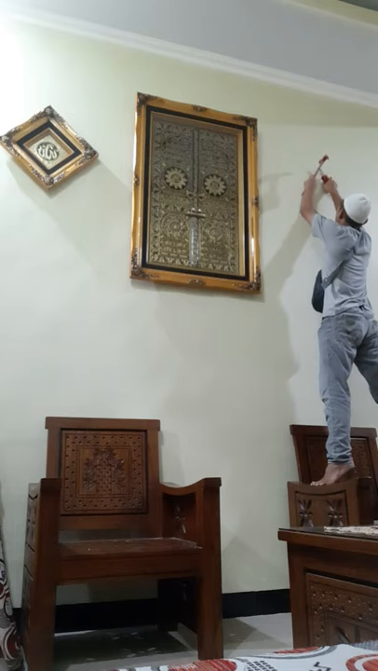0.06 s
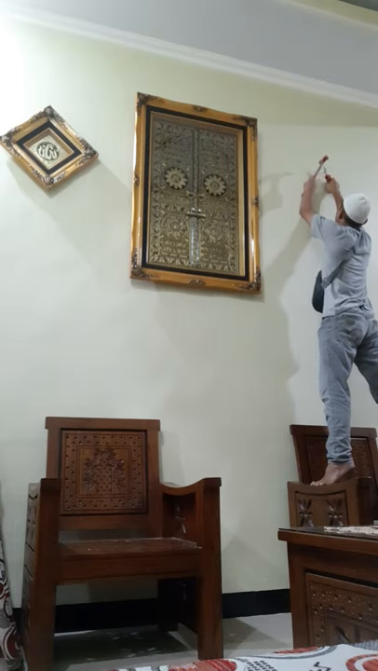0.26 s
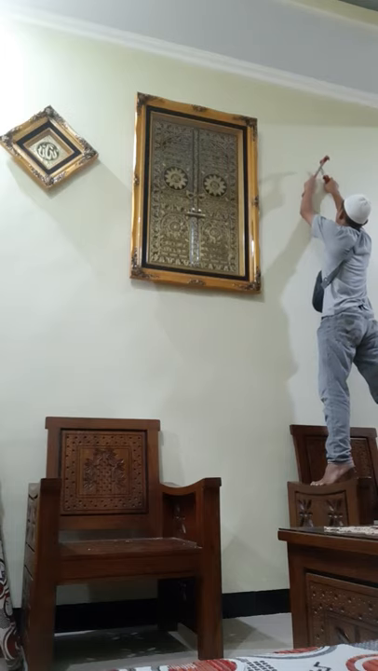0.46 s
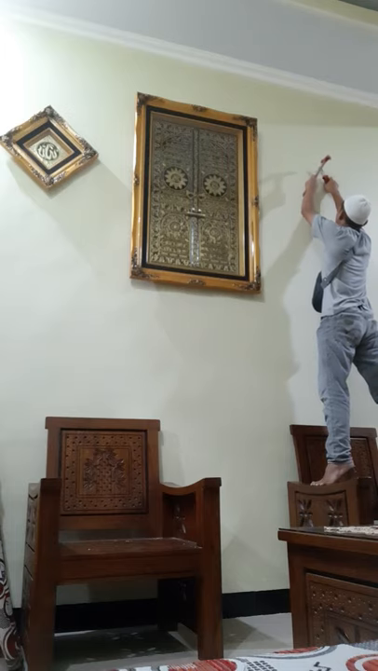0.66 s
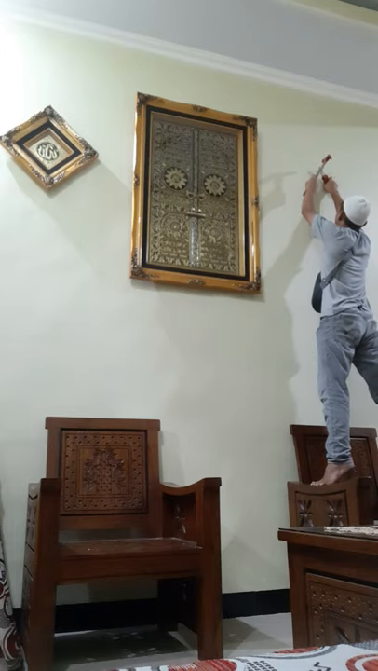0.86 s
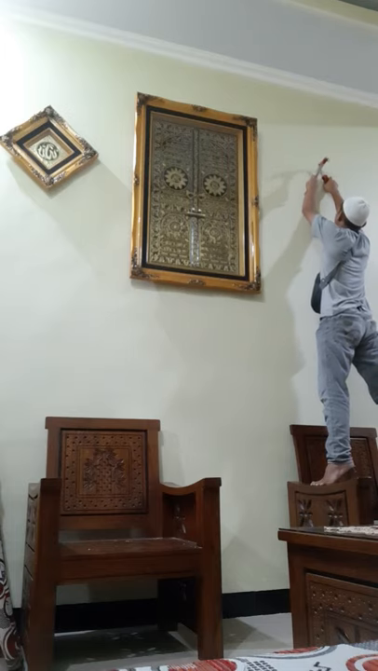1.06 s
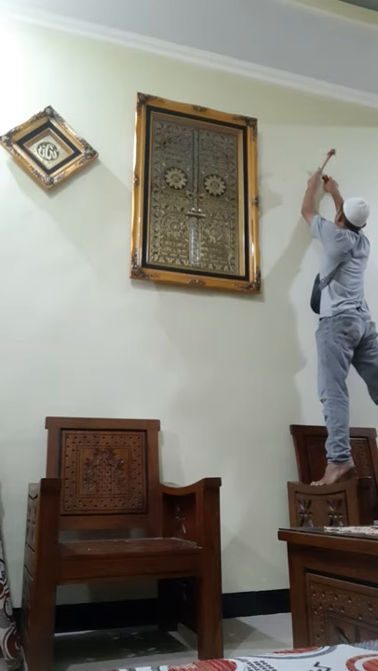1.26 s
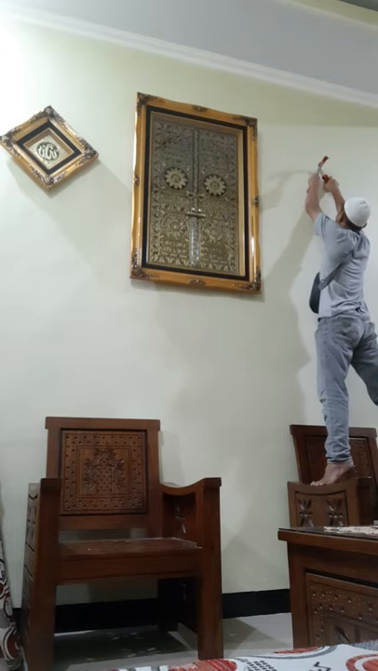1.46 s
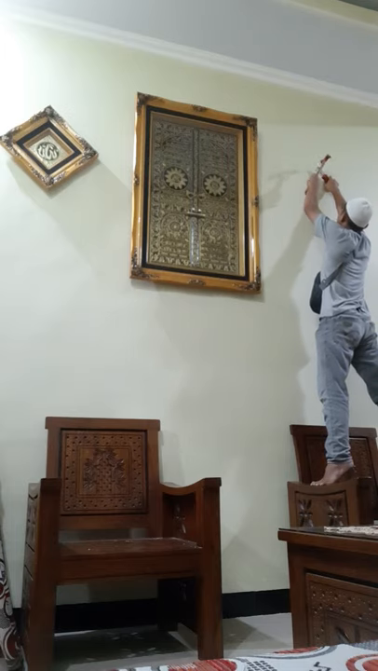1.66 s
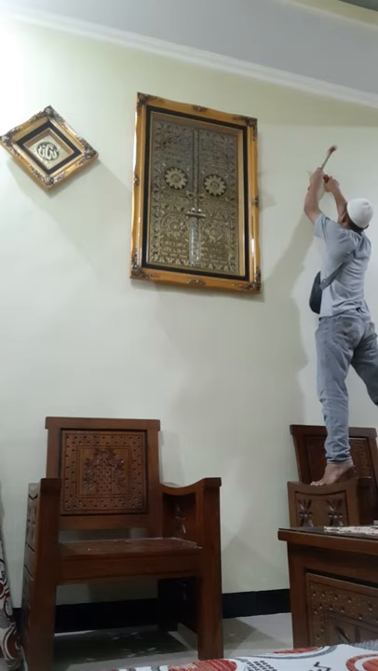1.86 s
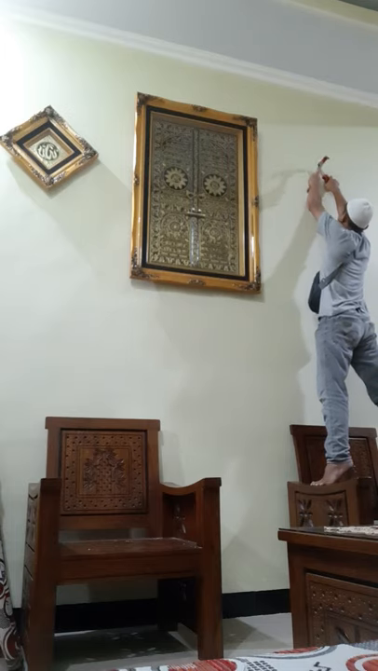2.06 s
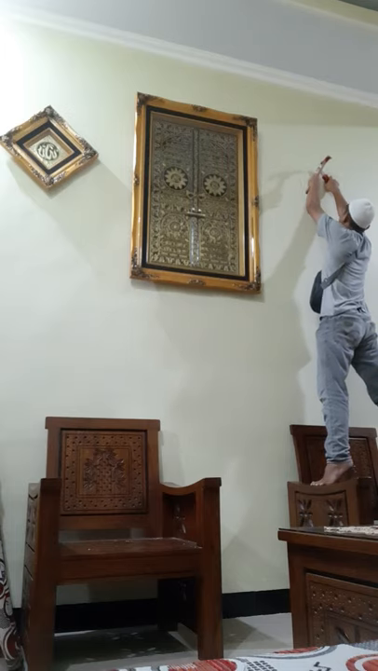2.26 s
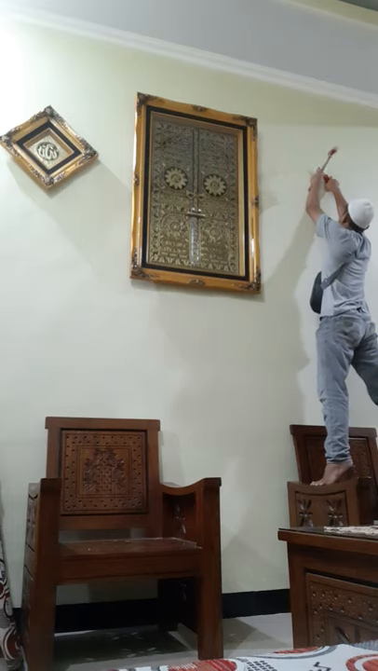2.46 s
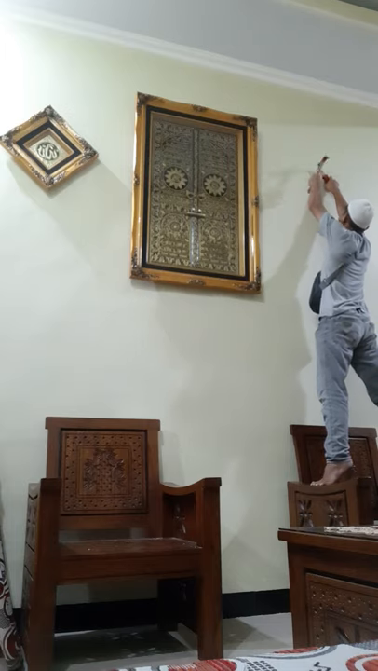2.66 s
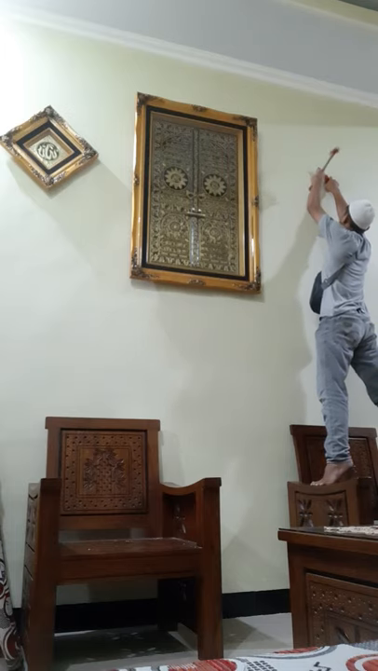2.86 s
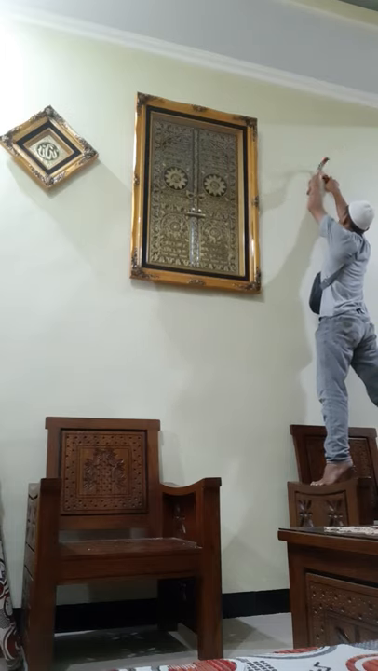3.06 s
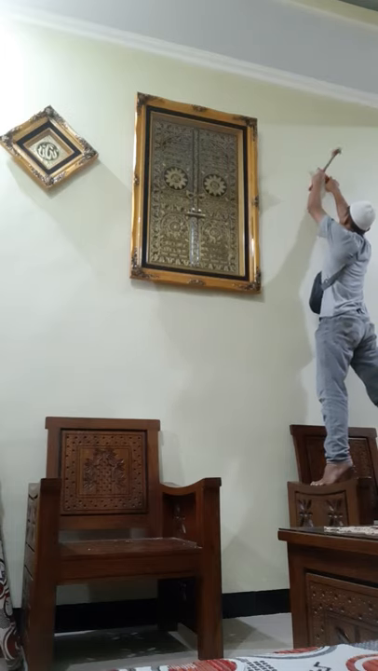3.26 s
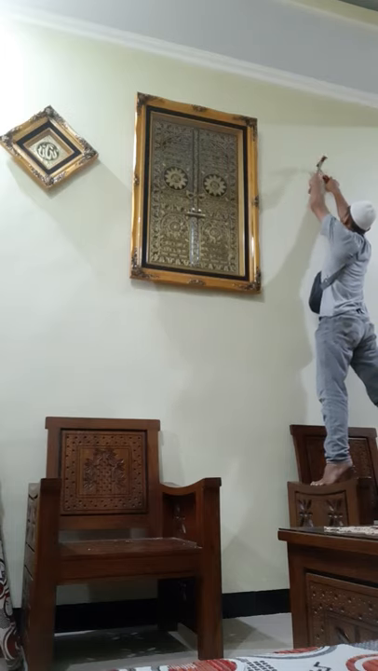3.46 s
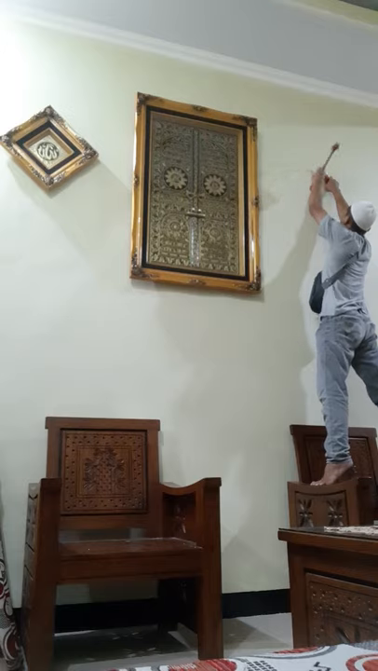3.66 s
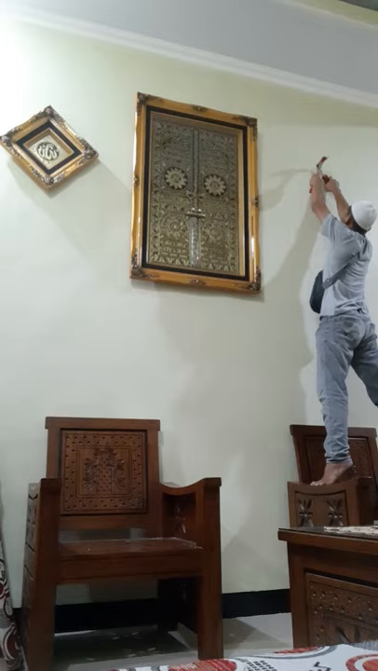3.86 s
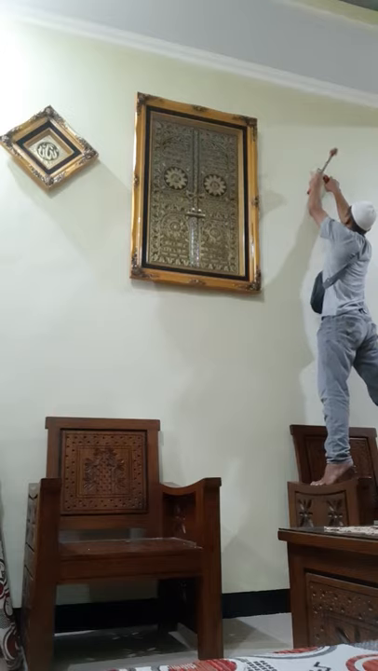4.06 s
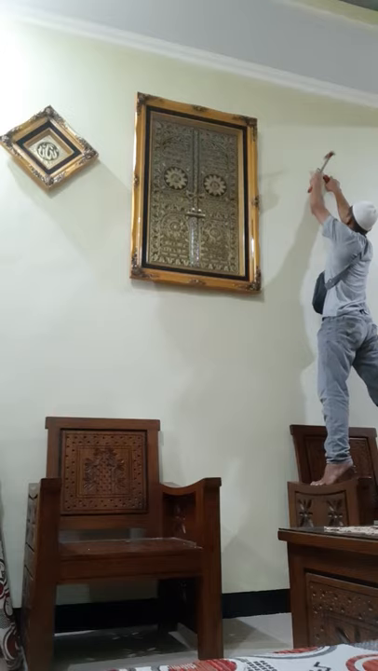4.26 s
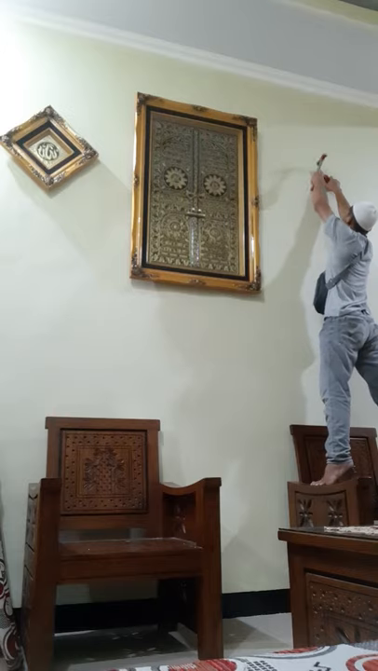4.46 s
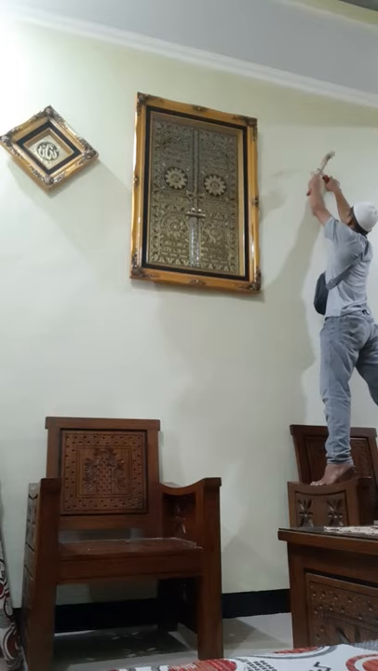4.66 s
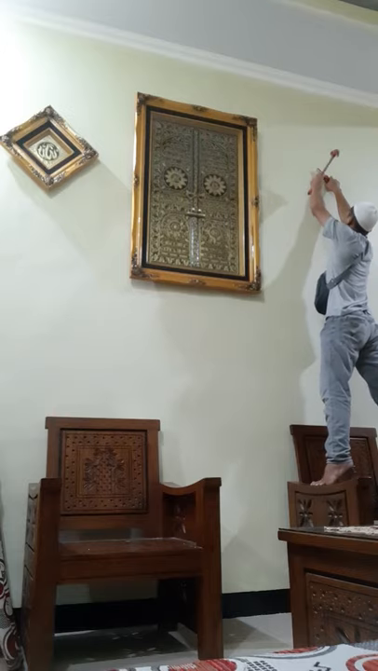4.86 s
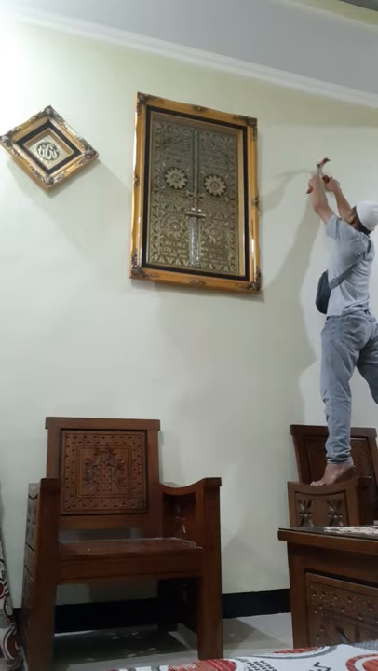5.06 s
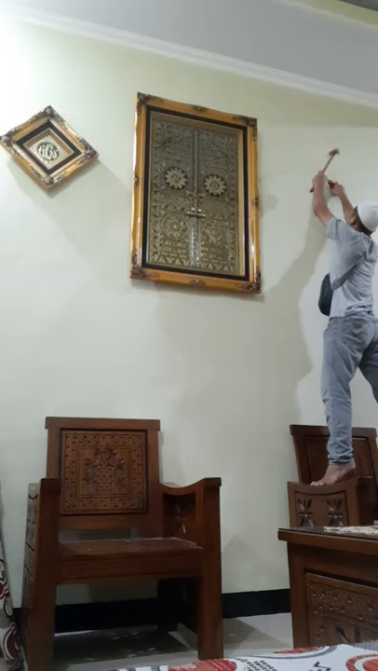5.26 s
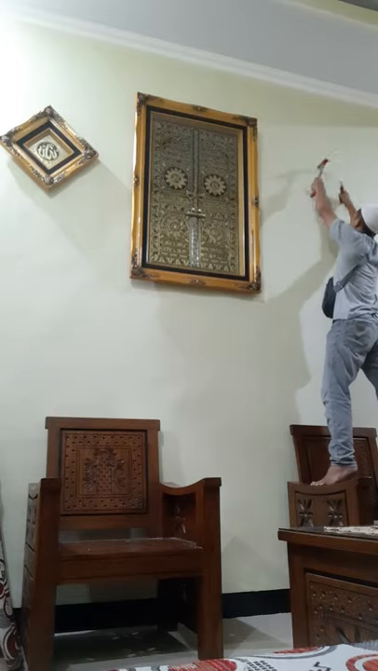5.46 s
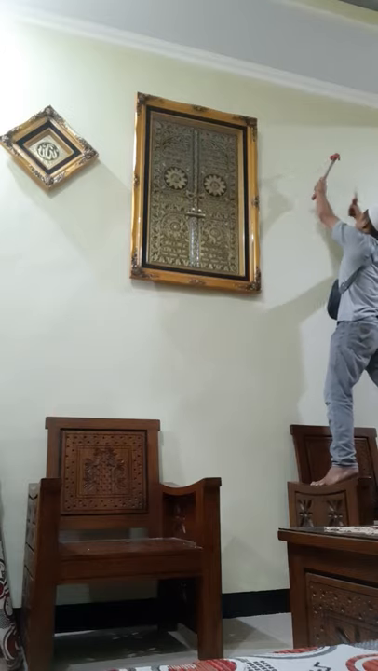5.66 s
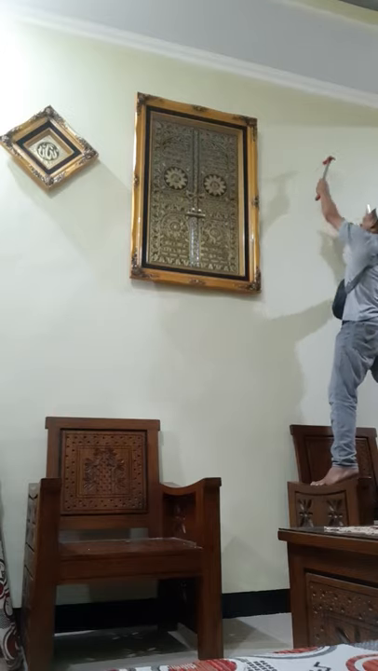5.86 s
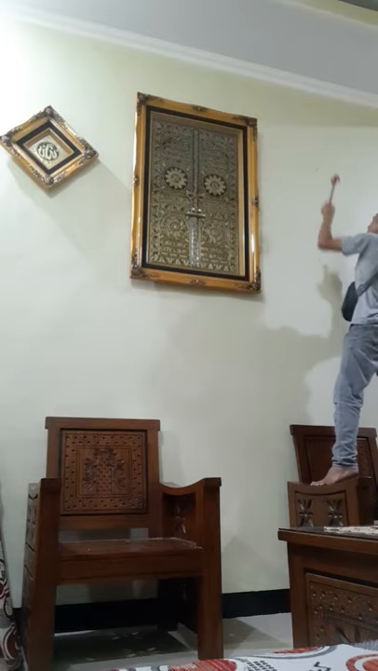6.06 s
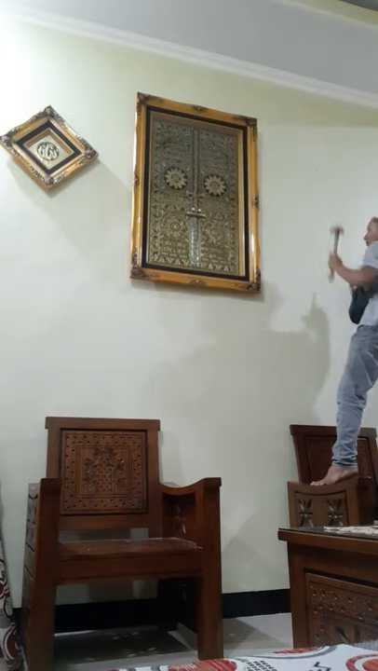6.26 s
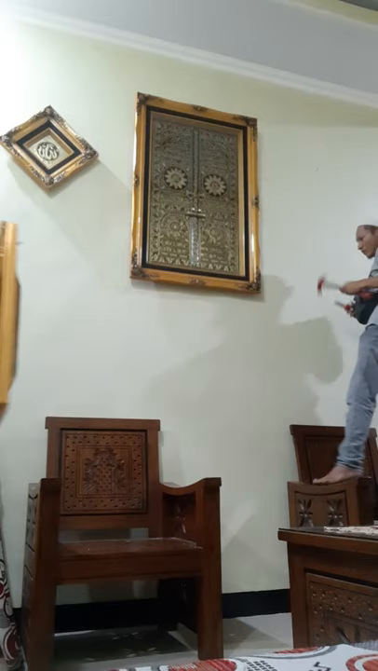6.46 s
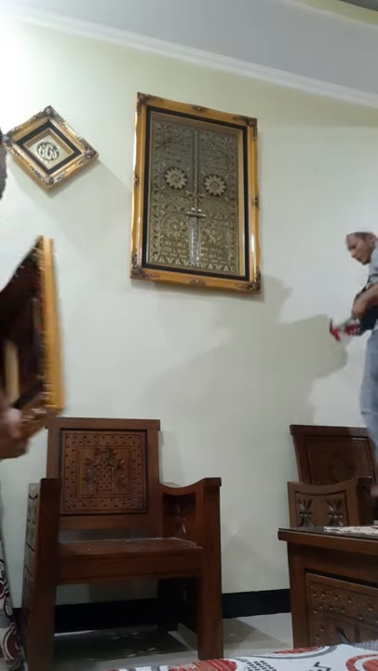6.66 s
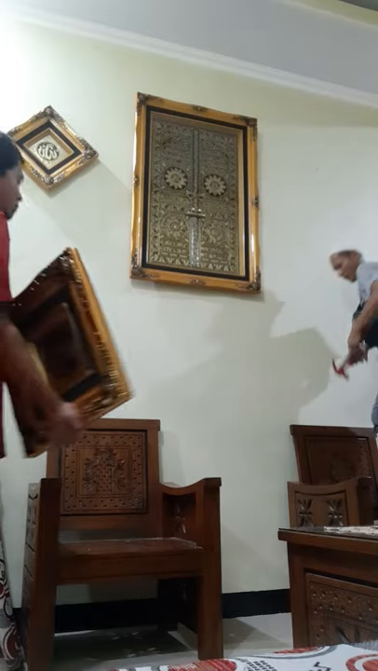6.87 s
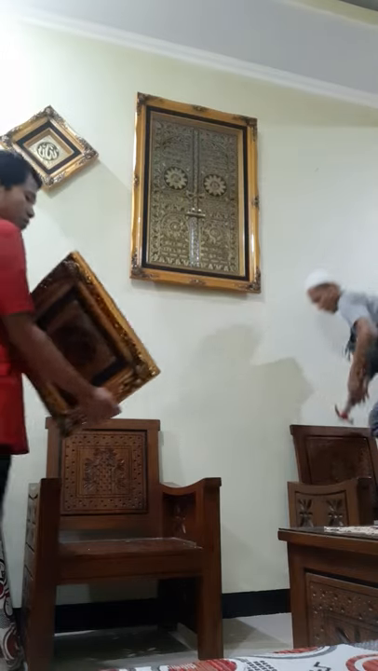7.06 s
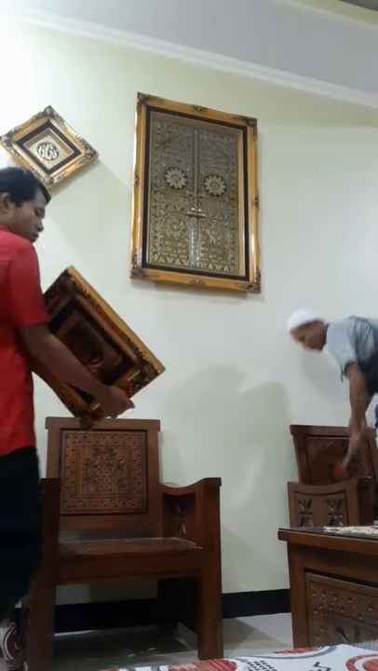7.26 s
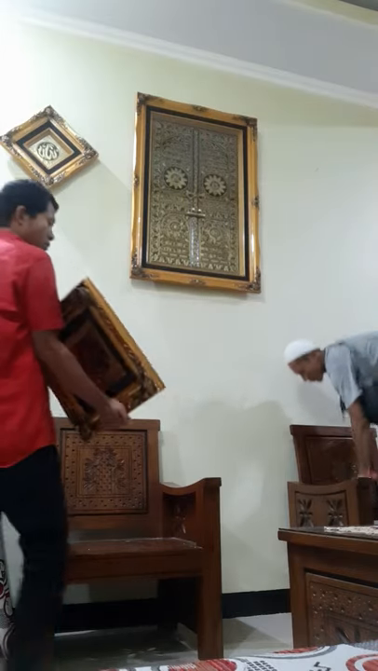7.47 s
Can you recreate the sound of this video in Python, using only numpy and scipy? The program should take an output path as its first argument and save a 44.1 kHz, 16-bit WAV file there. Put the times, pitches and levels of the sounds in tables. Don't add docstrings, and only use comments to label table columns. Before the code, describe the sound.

Quiet room air and dull distant traffic come first, with a brief cloth rustle. Then a hammer hits a nail in a plastered wall: a dull thud, a loud knock, light taps between full blows, then regular hard strikes two or three a second. Steel snaps and rings very briefly, and the bare room answers with a lively tail. After the last blow the reverberation fades into faint clothing movement and a wooden frame being handled, heard from across the room.

```python
import sys
import numpy as np
from scipy import signal
from scipy.fft import rfft, irfft
from scipy.io import wavfile
from scipy.ndimage import uniform_filter1d

SR = 44100
rng = np.random.default_rng(int(sys.argv[2]) if len(sys.argv) > 2 else 0)


def voltage_ratio(decibels):
    exponent = np.asarray(decibels, float) / 20
    return 10 ** exponent


def wav_record(signal):
    frames = np.transpose(np.atleast_2d(signal))
    bounded = np.clip(frames, -1, 1)
    quanta = np.round(bounded * 32767).astype(np.int16)
    wavfile.write(sys.argv[1], SR, quanta)


N = 330744

# (time [s], push level [dB], contact time [ms], crack level [dB], steel ring level [dB])
BLOWS = [(1.108, -13.5, 1.3, -50.5, -48), (1.451, -5.6, 1.15, -33, -41), (1.8007, -18, 0.666, -43, -59),
         (2.1095, -7, 0.981, -28, -31.5), (2.4068, -21.5, 0.6506, -46, -54),
         (2.7031, -8.5, 0.898, -28, -37), (3.1205, -8, 0.931, -28, -36), (3.5052, -8, 0.98, -29, -37),
         (3.8625, -8.5, 0.977, -28, -36.5), (4.178, -9, 0.915, -28, -36.5), (4.4625, -9, 0.954, -30, -43),
         (4.747, -9, 0.988, -28.5, -29.5), (5.008, -9.5, 1.069, -29.5, -35), (5.5169, -9, 1.245, -29, -43),
         (5.8112, -10, 1.128, -30.5, -42)]
# (frequency [Hz], level [dB])
WALL_RADIATION = [(30, -36.5), (60, -17.5), (110, -15.5), (160, -9.5), (250, -2.5), (400, -2), (700, 0),
                  (1000, 1.5), (1330, 5.5), (1650, -2), (2200, 1), (2800, 1), (3100, -15), (16000, -43.5)]
# (frequency [Hz], level [dB])
CRACK_COLOUR = [(1000, -54.5), (2000, -3), (2700, -4), (3200, -5), (4400, -1), (6000, -7.5), (7600, -8),
                (8600, -15.5), (9600, -28), (16000, -52.5)]
# (frequency [Hz], level [dB], decay time T60 [s])
STEEL_MODES = [(4462, 9, 0.04), (4700, -5.5, 0.026), (7000, -6, .05), (7468, -4, .015), (7957, -10, .02)]
# (frequency [Hz], level [dB])
FIZZ_COLOUR = [(5500, -19), (7000, 1), (9500, -3), (11000, -3), (13500, -1), (15300, -4.5), (17000, 4.5)]
# (time [s], level [dB])
FRAME_TICKS = [
    (7.058, -41.5),
    (7.078, -66),
]
# (time after blow [s], level [dB], right lag [ms])
BASS_ECHOES = [(.003, -1, .5), (.006, -3.5, .5), (0.0116, -4, .3), (0.0199, 4, .1), (.032, -9, .1),
               (0.0661, -1, .1)]
# (time after blow [s], left level [dB], right level [dB])
TREBLE_ARRIVALS = [(.0006, 1.5, 2), (.0035, -20, -9.5), (.0065, -23.5, -14), (0.0178, -11.5, -2),
                   (0.018, -4, 0.5), (.023, 1.5, -1.5)]
# (frequency [Hz], decay time T60 [s])
ROOM_DECAY = [(100, 1.12), (260, 0.6745), (700, 0.613), (1840, 0.6254), (4850, 0.59), (12800, 0.442)]
# (frequency [Hz], level [dB], decay time T60 [s])
STANDING_WAVES = [(62, 2, .25), (86, -5, .9), (141, -1, .8), (206, -2, .6), (257, 1, .62), (272, -6, .6),
                  (306, -5, .6), (332, 1, .6), (368, -5, .6), (408, 1, .6), (455, -6, .6), (484, -4, .6),
                  (550, -3, .6), (584, -3, .6), (622, -4, .6)]
# (frequency [Hz], left over right [dB])
BODY_SHADING = [(60, -5), (100, 4.5), (180, 1.5), (310, 0.5), (550, -2), (950, 5.5), (1650, 6), (2860, 5),
                (4970, 2), (8640, 13), (15000, 15)]
# (frequency [Hz], density [dB per Hz])
AIR_SPECTRUM = [(25, -57.5), (45, -34), (80, -4.5), (135, -10), (250, -13.5), (450, -16), (800, -24.5),
                (1500, -31), (2500, -39.5), (4500, -42.5), (6500, -43.5), (8500, -49.5), (9500, -55),
                (15000, -54.5)]
# (frequency [Hz], left over right [dB])
AIR_BALANCE = [(60, -1), (150, 2), (380, -1), (950, 5), (2380, 11.5), (5980, 6.5), (15000, 8)]
# (time [s], level [dB])
STREET_SWELL = [(0, 4.5), (.22, 3.5), (.42, 0.5), (.52, 1.5), (.7, -0.5), (1.0, -4.5), (1.1, 4.5),
                (6.33, 0.5), (6.45, -1), (6.54, -0.5), (6.62, -3.5), (6.9, -4), (6.98, -1), (7.18, -0.5),
                (7.33, 1), (7.5, 0.5)]
# (frequency [Hz], depth of swell [dB per dB])
SWELL_DEPTH = [(100, 0.6), (500, 1.6242), (2500, 1.32), (8000, 0.34), (12000, 0.55)]
# (time [s], length [s], level over the air [dB], centre [Hz], width [octaves])
RUSTLES = [(.12, 0.18, 11.5, 4800, 0.63), (0.801, 0.08, 2.5, 6000, 0.21), (0.809, .08, 8, 13500, .3),
           (0.933, 0.13, 5, 1750, 0.124), (1.023, .12, -1, 2500, 1.2), (6.68, .4, 1, 1600, 1.4),
           (6.89, .09, 6, 11000, .6), (6.952, 0.13, 5, 900, .6), (6.995, .12, 10, 3500, .7),
           (7.047, .1, 9, 11500, 0.27), (7.08, 0.27, 4.5, 2500, 1.2), (7.271, 0.36, 7.5, 4500, 2.2)]
# (frequency [Hz], level [dB])
HISS_COLOUR = [(2000, -21.5), (6000, 4), (9000, -4), (12000, -10), (16000, 2)]

FIZZ_DB, FIZZ_PER_PUSH, GRIT_SPENT_DB_PER_S = -24.5, 1.05, .2
SEATED_S, SEATED_DB = 5.3, 3
ROUND_HARD, ROUND_PER_DB2, CLEAN_CRACK_DB = .29, .011, -27
RING_RISE_S = .0008
FAR_WALL_S = .0254
PORT_GAP = 21
RUSTLE_RISE = 0.19
EDGE_HZ = 15850


def hammering():
    dry = np.zeros(N + 4096)
    for s, push_db, *strength in BLOWS:
        fizz_db = FIZZ_DB + FIZZ_PER_PUSH * push_db - GRIT_SPENT_DB_PER_S * s
        fizz_db -= SEATED_DB * (s > SEATED_S)
        dry[round(s * SR):][:4096] += blow(push_db, *strength, fizz_db)
    impulse = np.arange(4096) == 0
    for s, db in FRAME_TICKS:
        dry[round(s * SR):][:4096] += voltage_ratio(db) * band(impulse, 10400, 13000)
    reverberant = signal.fftconvolve(dry[None], room(), axes=1)[:, :N]
    return shaded(reverberant, BODY_SHADING)


def blow(push_db, contact_ms, crack_db, ring_db, fizz_db):
    t = np.arange(4096) / SR
    phase = t * 1000 / contact_ms
    roundness = ROUND_HARD + ROUND_PER_DB2 * max(CLEAN_CRACK_DB + push_db - crack_db, 0) ** 2
    force = abs(np.sin(np.pi * np.clip(phase, 0, 1))) ** roundness
    force = force * (t * 1000 < contact_ms) / contact_ms
    force = force * np.exp(-.55 * phase)
    push = signal.fftconvolve(force, causal(WALL_RADIATION))[:4096] / 20

    detune = rng.uniform(1.0, 1.007, len(STEEL_MODES))
    ring = np.zeros(4096)
    for (mode_hz, db, t60), shift in zip(STEEL_MODES, detune):
        ring += voltage_ratio(db - 60 * t / t60) * np.sin(2 * np.pi * mode_hz * shift * t)
    ring = unit(ring) * np.minimum(t / RING_RISE_S, 1)

    hz = np.geomspace(500, 20000, 60)
    crack_power = voltage_ratio(crack_db + 31.0 + read(CRACK_COLOUR, hz)) ** 2
    fizz_power = voltage_ratio(fizz_db + 15.5 + read(FIZZ_COLOUR, hz)) ** 2
    snap = causal(np.transpose([hz, 10 * np.log10(crack_power + fizz_power)]))
    return voltage_ratio(push_db + 23.0) * push + scattered(snap) + voltage_ratio(ring_db + 13) * ring


def scattered(x):
    radius = .75
    for hz in rng.uniform(3890, 15525, 6):
        pole = np.array([1, -2 * radius * np.cos(2 * np.pi * hz / SR), radius ** 2])
        x = signal.lfilter(pole[::-1], pole, x)
    return x


def room():
    size = SR
    hz, t, z = signal.stft(diffuse(size, 0.518), SR, nperseg=512)
    decay = voltage_ratio(-60 * t / read(ROOM_DECAY, hz)[:, None])
    tail = signal.istft(z * decay, SR, nperseg=512)[1][:, :size]

    t = np.arange(size) / SR
    standing = np.zeros(size)
    for mode_hz, db, t60 in STANDING_WAVES:
        standing += voltage_ratio(db - 60 * t / t60) * np.cos(2 * np.pi * mode_hz * (t - FAR_WALL_S))
    echoes = np.zeros((2, size))
    for s, db, lag_ms in BASS_ECHOES:
        echoes[0, round(s * SR)] += voltage_ratio(db + 9.0)
        echoes[1, round((s + lag_ms / 1000) * SR)] += voltage_ratio(db + 9.0)
    build = 1 - np.exp(-(t / 0.00601) ** 2)
    low = band(build * (voltage_ratio(-11.0) * tail + voltage_ratio(-33.5) * standing), 51, 601.3)
    low = low + band(echoes, 5, 855)

    corner = (1 - np.exp(-t / .0006)) * np.exp(-t / .005)
    knock = band(tail * corner * voltage_ratio(np.array([[-2], [-7]])), 1280, 3164)
    middle = band(tail * (voltage_ratio(-11.0) * build + voltage_ratio(-2) * corner), 702.7, 2632)

    glints = np.zeros((2, size))
    for s, left_db, right_db in TREBLE_ARRIVALS:
        smear = voltage_ratio(-60 * abs(t - s) / .012) * (t > s - .0004)
        glints += voltage_ratio(np.array([[left_db], [right_db]])) * smear
    treble = band(voltage_ratio(-17.0) * tail * (1 - np.exp(-t / 0.0028) + glints), 2376, 19116)
    return low + middle + knock + treble


def diffuse(size, toward_left):
    cosines = np.linspace(-1, 1, 15)
    waves = rng.standard_normal((15, size)) * np.exp(toward_left * cosines)[:, None]
    right = sum(np.roll(w, round(PORT_GAP * c)) for w, c in zip(waves, cosines))
    return evened(np.array([waves.sum(0), right]))


def shaded(x, balance):
    db = read(balance, np.fft.rfftfreq(x.shape[1], 1 / SR)) / 2
    return irfft(rfft(x) * voltage_ratio(np.array([db, -db])), x.shape[1])


def causal(points):
    cepstrum = irfft(np.log(voltage_ratio(read(points, np.fft.rfftfreq(8192, 1 / SR)))))
    cepstrum[1:4096] *= 2
    cepstrum[4097:] = 0
    return irfft(np.exp(rfft(cepstrum)))[:4096]


def band(x, lo_hz, hi_hz):
    return signal.sosfilt(signal.butter(3, [lo_hz, hi_hz], "band", fs=SR, output="sos"), x)


def read(points, hz):
    f, value = np.transpose(points)
    return np.interp(np.log(hz + 1), np.log(f + 1), value)


def evened(x):
    return x / np.sqrt(np.mean(x ** 2) + 1e-20)


def unit(x):
    return x / np.sqrt(np.sum(x ** 2) + 1e-20)


def rustle(hz, t, start, length, db, centre_hz, octaves):
    u = (t - start) / length
    stroke = np.clip(np.minimum(u / RUSTLE_RISE, (1 - u) / (1 - RUSTLE_RISE)), 0, 1)
    hump = np.exp(-(np.log2((hz[:, None] + 1) / centre_hz) / octaves) ** 2)
    return voltage_ratio(2 * db) * hump * stroke


def air():
    hz, t, z = signal.stft(diffuse(N, 0.515), SR, nperseg=1024)
    patches = uniform_filter1d(rng.standard_normal(z.shape[1:]), 10, 0)
    patches = evened(uniform_filter1d(patches, 5, 1))
    z = z * voltage_ratio(read(AIR_SPECTRUM, hz)[:, None] + 0.876 * patches)
    swell_db = np.interp(t, *np.transpose(STREET_SWELL))
    street = voltage_ratio(2 * read(SWELL_DEPTH, hz)[:, None] * swell_db)
    power = street + sum(rustle(hz, t, *row) for row in RUSTLES)
    noise = signal.istft(z * np.sqrt(power), SR, nperseg=1024)[1][:, :N]
    return voltage_ratio(-47.5) * shaded(evened(noise), AIR_BALANCE)


def scene():
    return hammering() + air()


def top_cut(x):
    return signal.sosfilt(signal.butter(12, 17050, fs=SR, output="sos"), x)


def record(dry):
    hiss_response = unit(causal(HISS_COLOUR))[None]
    hiss = signal.fftconvolve(rng.standard_normal((2, N)), hiss_response, axes=1)[:, :N]
    bass_cut = signal.butter(3, 50, "high", fs=SR, output="sos")
    heard = signal.sosfilt(bass_cut, dry + voltage_ratio(-80.5) * hiss)
    band_limit = signal.firwin(301, EDGE_HZ, window=("kaiser", 8), fs=SR)
    heard = signal.oaconvolve(heard, band_limit[None], "same")
    return top_cut(np.clip(heard, -1, 1))


dry = scene()
out = record(dry)
wav_record(out)
```